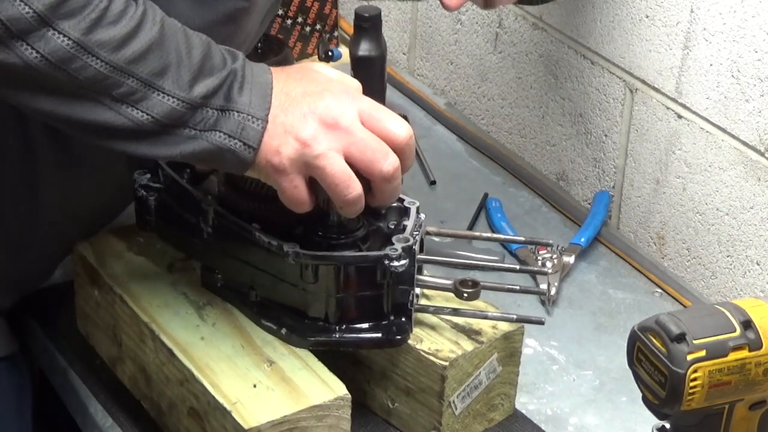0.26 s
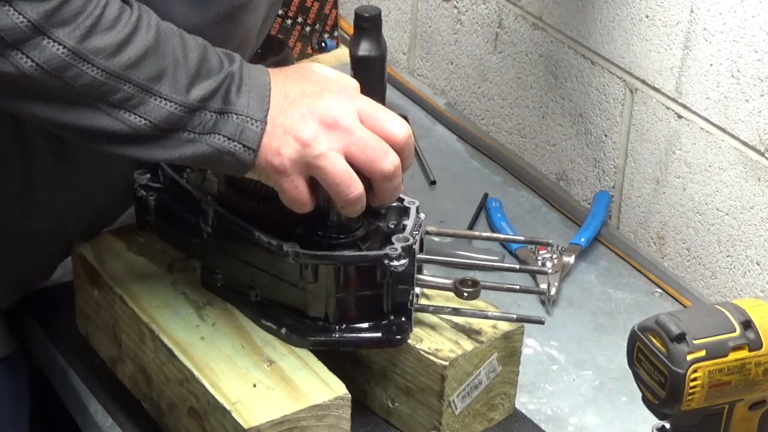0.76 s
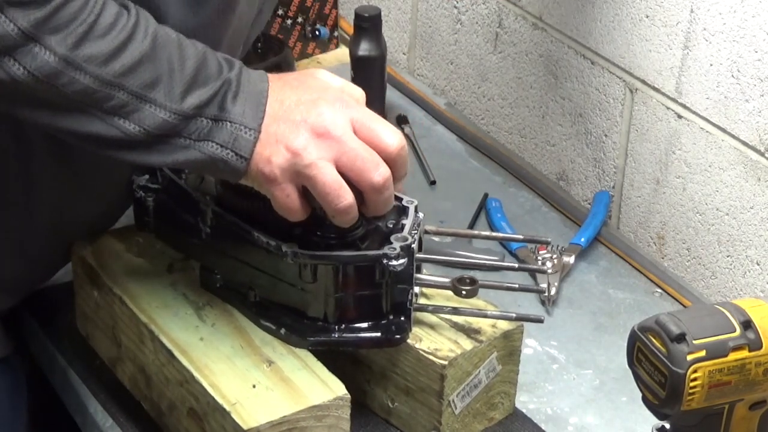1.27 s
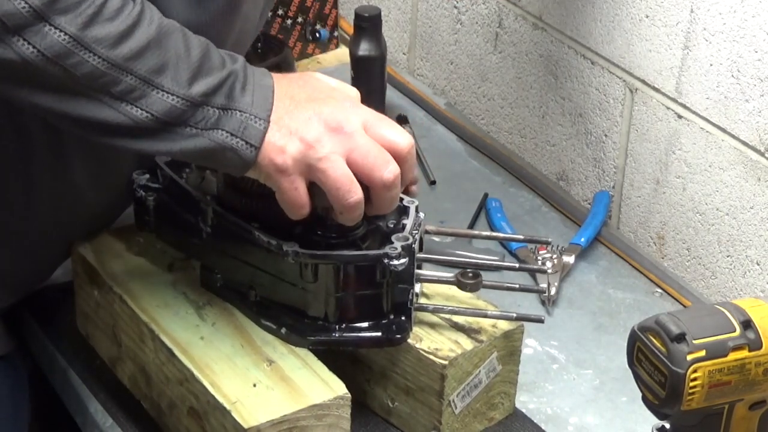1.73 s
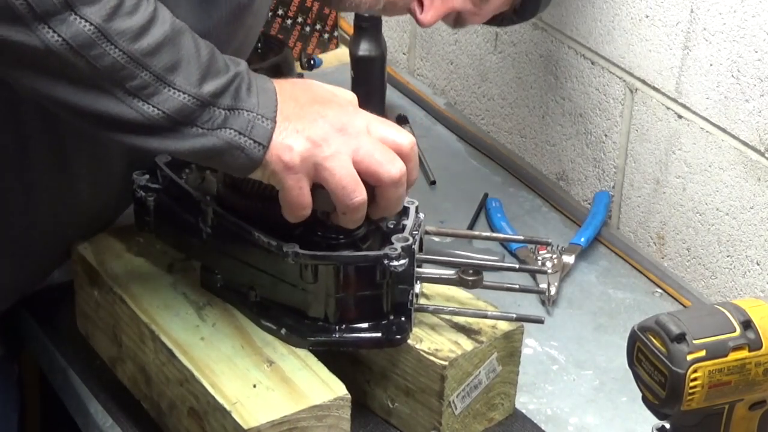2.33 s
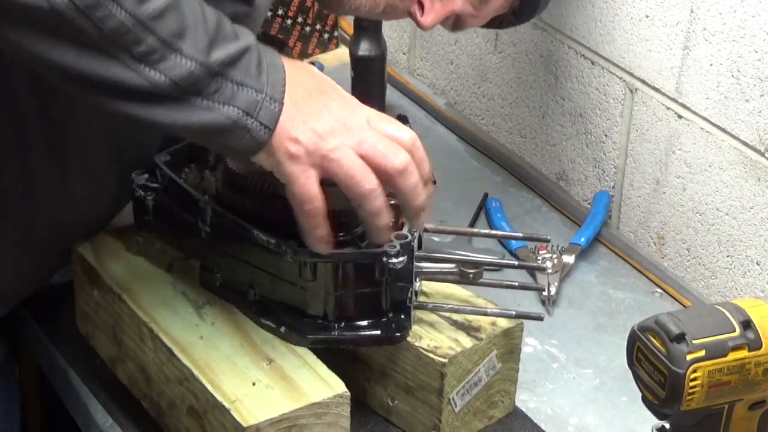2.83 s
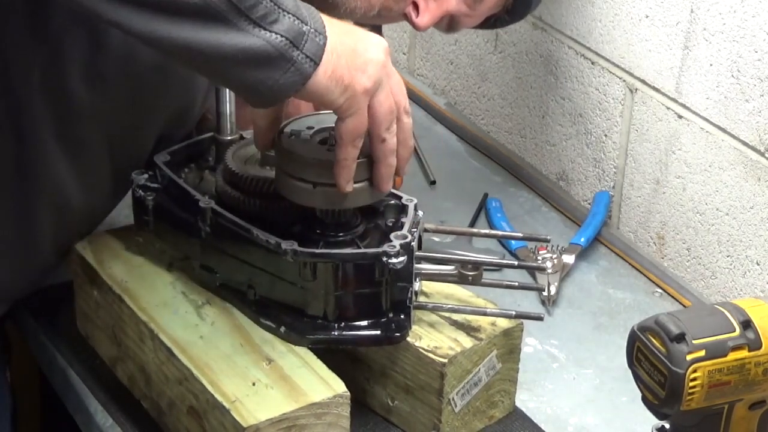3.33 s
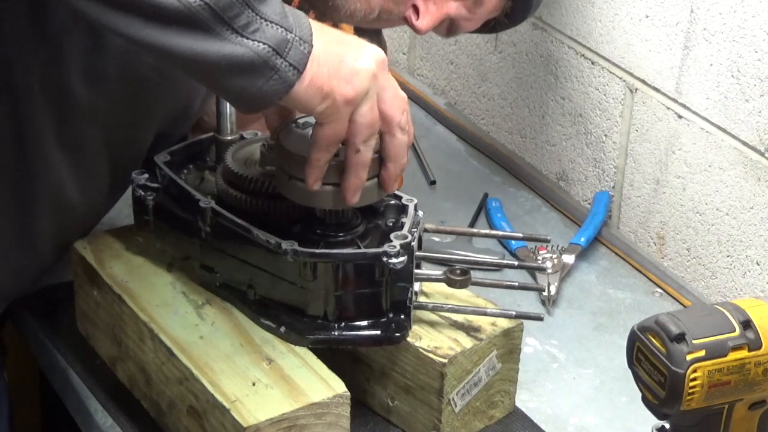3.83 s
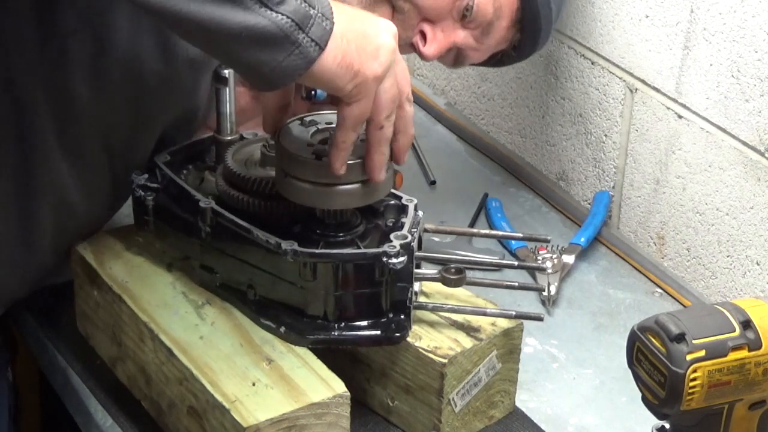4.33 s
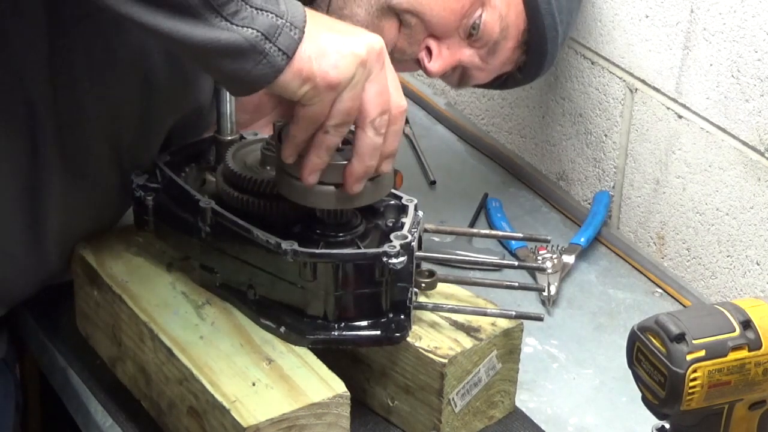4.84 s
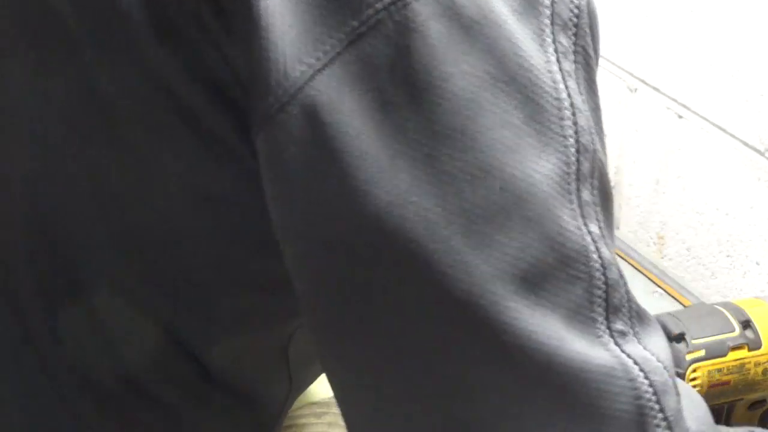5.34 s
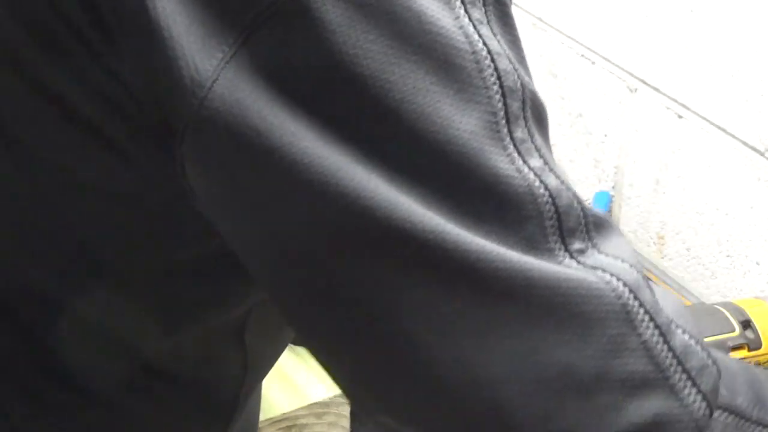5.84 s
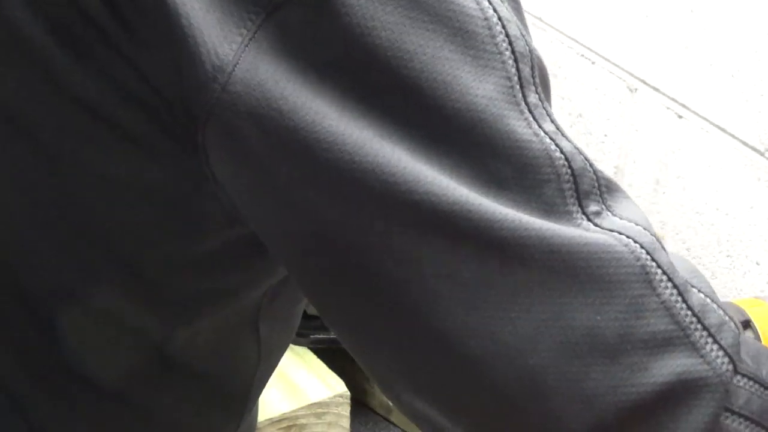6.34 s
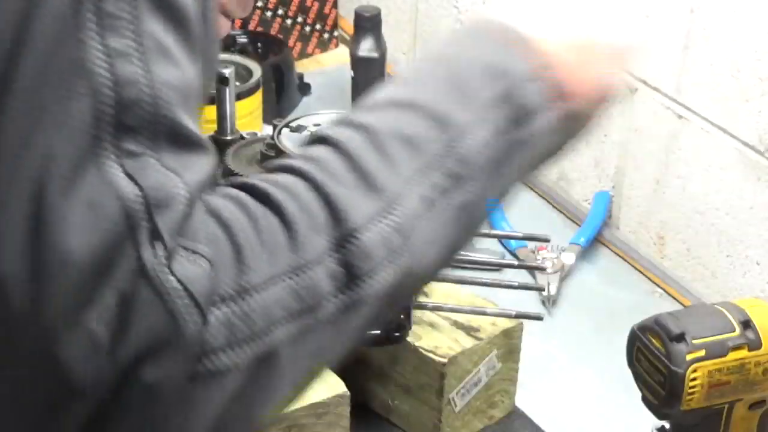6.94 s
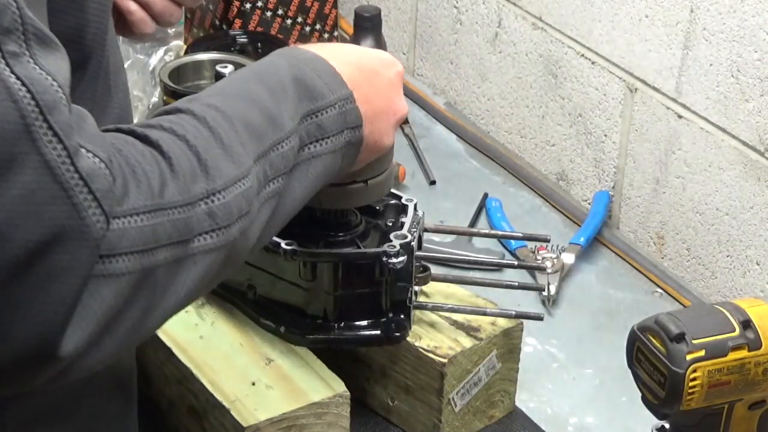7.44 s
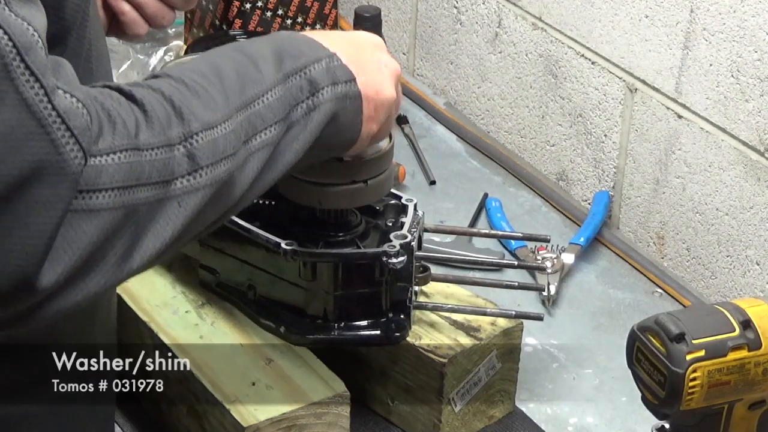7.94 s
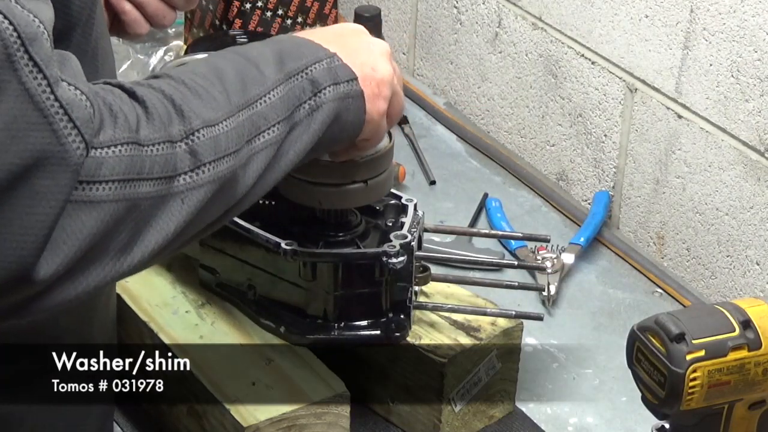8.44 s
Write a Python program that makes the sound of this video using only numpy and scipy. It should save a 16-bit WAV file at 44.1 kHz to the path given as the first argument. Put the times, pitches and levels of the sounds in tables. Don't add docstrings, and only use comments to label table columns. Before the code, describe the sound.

A heavy metal drum knocks and drops ringing into a hollow gearcase, then a motor hums while gears clink and a thin washer pings.

```python
import sys
import numpy as np
from scipy import signal
from scipy.io import wavfile
from scipy.ndimage import uniform_filter1d

SR = 44100
rng = np.random.default_rng(int(sys.argv[2]) if len(sys.argv) > 2 else 0)


def boost_factor(decibels):
    exponent = np.asarray(decibels, float) / 20
    return 10 ** exponent


def wrap_up_sound(samples):
    columns = np.atleast_2d(samples).T
    tamed = np.clip(columns, -1, 1)
    steps = np.round(tamed * 32767).astype(np.int16)
    wavfile.write(sys.argv[1], SR, steps)


N = 383217

# t/s, peak level/dB, thud under it/dB, edge
# over it/dB
DAMPED_TAPS = [(0.0014, -52, 11, 8), (0.0287, -22, -22, -1), (0.0454, -51.5, 18.5, -9),
               (0.5274, -46, -12, 12), (0.534, -41.5, -21, 1), (0.925, -43, 4, -20.5),
               (1.2288, -37, -21, -11), (1.4892, -47, 4, -2), (1.6781, -56, 19, 3), (2.4905, -52.5, 5, -2),
               (2.8202, -63, 3, 14), (2.845, -63.5, 1, 14), (2.8836, -38, 2, -26), (2.9148, -42.5, -23, -5),
               (3.5445, -44, 6.5, -9), (4.006, -48.5, -16, 4), (4.241, -52, -17, -10),
               (4.698, -38, -29, -7.5), (4.9136, -23.5, -17, -18.5), (5.5995, -47.5, 13.5, 0),
               (5.4633, -39.5, 4.5, -30), (5.314, -41, 5, -30), (6.098, -28, -17, -6),
               (6.1048, -29, -32, -21.5)]
# f/Hz, level/dB, time to fade 60 dB/s
GEAR_RIM = [(5680, -6, .07), (7885, 1, .08), (10400, -16, .06)]
# f/Hz, level/dB, time to fade 60 dB/s
GEAR_HUB = [(1980, -9, .03), (2760, -7, 0.04), (3105, -10, 0.04), (4440, -13, 0.029), (6560, -11, 0.03)]
# t/s, peak level/dB, brightness step per band/dB, ring/dB
WASHER_PINGS = [
    (7.9835, -28, 4.5, -25),
    (8.0195, -37, 6, -21),
    (8.0249, -25.5, 9, -30),
    (8.4259, -46, 5, -23),
    (8.4455, -25, 9, -28),
    (8.4625, -20, 9, -29.5),
    (8.465, -24.5, 1, -32),
    (8.5078, -25.5, 8, -30),
]


def rms_one(x):
    return x / np.sqrt(np.mean(x ** 2) + 1e-20)


def in_time(rows):
    s, *columns = np.transpose(rows)
    return [np.interp(np.arange(N) / SR, s, c, left=-150, right=-150) for c in columns]


def at_hz(points, hz):
    pitches, values = np.array(points)[:, 0], np.array(points)[:, 1]
    return np.interp(np.log(hz), np.log(pitches), values)


def band(x, low_hz, high_hz):
    return signal.sosfilt(signal.butter(2, [low_hz, high_hz], "band", fs=SR, output="sos"), x)


def drift(rate):
    r = np.exp(-80 * np.pi * rate / SR)
    white = rng.standard_normal(N // 40 + 2002)
    slow = signal.lfilter([1], [1, -2 * r, r * r], white)[2000:]
    return np.interp(np.arange(N) / 40, np.arange(len(slow)), rms_one(slow))


def ring(force, modes):
    out = 0
    for k, (hz, level_db, t60) in enumerate(modes):
        r, w = boost_factor(-60 / (t60 * SR)), 2 * np.pi * hz / SR
        gain = (-1) ** k * boost_factor(level_db) * np.sin(w)
        out = out + signal.lfilter([0, gain], [1, -2 * r * np.cos(w), r * r], force + 1e-18)
    return out


def banded_noise(spectrum, low_hz, count, patchy_db):
    # f/Hz, likeness/0 to 1
    likeness = [(100, 0.55), (250, 0.94), (1000, 0.27), (2500, 0.13), (4000, 0.94), (12000, 1)]
    out, white = 0, rng.standard_normal((2, 2, N))
    edges = low_hz * 2 ** (np.arange(count + 1) / 2)
    for k, (low, high) in enumerate(zip(edges, edges[1:])):
        mid, side = band(white[k % 2], low, high)
        hz = np.sqrt(low * high)
        alike = np.clip(at_hz(likeness, hz), 0, 1)
        gain = boost_factor(at_hz(spectrum, hz) + patchy_db * drift(2.54))
        out = out + gain * (np.sqrt(1 + alike) * mid + np.sqrt(1 - alike) * side * [[1], [-1]])
    return rms_one(out)


def contacts(events, rough_share):
    force, t = np.zeros((4, N + 4096)), np.arange(4096) / SR
    chatter, share = rng.standard_normal((len(events), 4096)), np.array(rough_share)[:, None]
    for (s, *levels_db, ms), rough in zip(events, chatter):
        push = np.minimum(t / .0006, 1) * np.exp(-3000 * t / max(ms, .3))
        first = round(s * SR)
        force[:, first:first + 4096] += boost_factor(levels_db)[:, None] * push * (share * rough + 1 - share)
    return force[:, :N] + 1e-18


def blows(events, bench_db, thud_db, edge_db):
    low_hz, high_hz, bench_under_thud_db = 1000, 4000, -16.5
    rows = [(s, db, db + low + bench_under_thud_db, db + low, db + high, ms)
            for s, db, low, high, ms in events]
    body, bench, thud, edge = contacts(rows, (1, 0, .8, 1))
    body = band(band(body, low_hz, high_hz), 700, 5000)
    edge = band(band(edge, high_hz, 9660), 2060, 11400)
    return (boost_factor(bench_db) * band(bench, 96, 290) + boost_factor(thud_db) * band(thud, 325, low_hz)
            + boost_factor(6.0) * body + boost_factor(edge_db) * edge)


def strikes(events):
    out = np.zeros(N)
    out[[round(row[0] * SR) for row in events]] = boost_factor([row[1] + 0.52 * row[2] for row in events])
    return out


def grit(per_s, spread_db):
    sizes = boost_factor(spread_db * np.minimum(rng.exponential(1, N), 5)) * rng.choice([-1, 1], N)
    return rms_one(sizes * (rng.random(N) < per_s / SR))


def strokes(rows, rise_share):
    t, out = np.arange(0, N + 32, 32) / SR, 0
    for s, level_db, hold, fade in rows:
        away = np.maximum(np.maximum((s - t) / rise_share, t - s - hold), 0)
        out = out + boost_factor(level_db - 20 * away / max(fade, .005))
    return np.interp(np.arange(N) / SR, t, out)


def held_rings(events, rough_db):
    out, t, flutter = np.zeros(N + SR), np.arange(SR // 4) / SR, rough_db * drift(260)
    for k, (s, level_db, hz, hold, t60) in enumerate(events):
        fade_db = 60 * np.maximum(t - hold, 0) / max(t60, .005)
        shape_db = level_db - fade_db + flutter[k * 5000:][:SR // 4]
        swell = np.minimum(t / .0015, 1)
        out[round(s * SR):][:SR // 4] += boost_factor(shape_db) * swell * np.sin(2 * np.pi * hz * t)
    return out[:N]


def dense_tail(x, colour, t60s, alike):
    t, tail = np.arange(SR) / SR, 0
    common, own = rng.standard_normal((2, 2, SR))
    for k, hz in enumerate(100 * 2 ** np.arange(0, 7.1, .25)):
        white = common[k % 2] + (1 - alike) * min(hz / 1000, 1) * own[k % 2] * [[1], [-1]]
        fading = boost_factor(at_hz(colour, hz) - 60 * t / at_hz(t60s, hz))
        tail = tail + band(white, hz / 2 ** .125, hz * 2 ** .125) * fading
    tail = tail * np.clip(t / 0.0019, 0, 1) / np.sqrt(SR)
    return signal.fftconvolve(x[None], tail, axes=1)[:, :N]


def tilted(events, middle_db, ms):
    return [(s, db - tilt, db + middle_db, db + tilt, db + rung, ms) for s, db, tilt, rung in events]


def clinks(events, edges_hz, free_modes, held_modes, ring_db, held_db):
    *forces, free = contacts(events, (1, 1, 1, 1))
    crack = sum(boost_factor(gain_db) * band(band(force, low, high), low / 1.86, high * 0.78)
                for force, gain_db, low, high in zip(forces, (4, 6, 6), edges_hz, edges_hz[1:]))
    return crack + boost_factor(held_db) * ring(crack, held_modes) + boost_factor(ring_db) * ring(free, free_modes)


def room_air():
    # f/Hz, level per Hz/dB
    air_colour = [(65, -41), (110, -9.5), (130, -12.5), (237, -9), (317, -9.5), (352, -10.5), (898, -18.5),
                  (1100, -27), (1200, -19.5), (3000, -26), (3260, -26.5), (15800, -36.5)]
    return banded_noise(air_colour, 90, count=15, patchy_db=0.5)


def lens_ticks():
    ticks_per_s, t = 29.97, np.arange(N) / SR
    since_tick = ((t - .005) * ticks_per_s % 1) / ticks_per_s
    steps = np.exp(-since_tick / .005) * boost_factor(1.5 * drift(10))
    return boost_factor(-16.0) * rms_one(ring(steps * rng.standard_normal(N),
                                     [(2360, 0.012, 0.0088), (3320, 0.008, 0.0084)]))


def whine():
    return boost_factor(-84) * rms_one(ring(rng.standard_normal(N), [(7870, 0, .05)]))


def rumble(air_db, hum_db):
    # f/Hz, level per Hz/dB
    deep_colour = [(12, -1), (25, 14), (40, 2), (60, -7.5), (90, -2.5), (125, -37.5)]
    # t/s, level/dB, hold/s, fade by 20 dB/s
    gusts = [
        (0.001, -41, .01, .5),
        (3.38, -58, 0.068, 0.5),
        (4.09, -50.5, 0.011, -1.1),
        (4.69, -55, 0.008, -2),
        (5.23, -31, 0.026, -0.11),
        (6.3, -35, 0.071, 1.3),
        (7.16, -27, 0.0096, -0.34),
        (7.5, -40, 0.83, 0),
        (8.66, -34.5, 0.037, 1.06),
    ]
    over_air_db, motor_shake_db = 5, -40.5
    shake = boost_factor(motor_shake_db) * (hum_db > -100) + boost_factor(hum_db - 26)
    deep, other = banded_noise(deep_colour, 12.05, count=7, patchy_db=2.0)[0], rng.standard_normal(N)
    room = boost_factor(air_db + over_air_db) * rms_one(band(other, 27.0, 70.0))
    return room + np.hypot(shake, strokes(gusts, 0.94)) * deep


def thumps_and_squeaks():
    # t/s, peak level/dB, f/Hz, time to fade 60 dB/s
    thumps = [(.001, -18.5, 142, 0.07), (.029, -26, 200, 0.026), (.142, -56, 202, 0.036),
              (0.161, -31, 199, 0.023), (1.337, -28, 198, 0.059), (1.35, -23.5, 218, 0.083),
              (1.368, -28, 139, 0.16), (1.489, -35, 129, 0.14), (2.053, -32.5, 139, 0.14),
              (2.063, -32, 221, 0.037), (2.886, -28.5, 136, 0.067), (4.69, -44, 274, 0.43)]
    # t/s, peak level/dB, f/Hz, time to fade 60 dB/s
    squeaks = [(.066, -49, 5840, 0.15), (.585, -58, 4600, .3), (.66, -56, 3890, .25),
               (.74, -50, 5850, 0.13), (0.754, -46, 5840, .08), (0.973, -37, 5950, 0.073),
               (4.008, -38, 7200, 0.075), (4.485, -52, 7260, 0.051), (5.315, -18.5, 2777, 0.056),
               (1.326, -16, 3210, 0.034), (1.326, -20, 5940, 0.042), (1.326, -19, 9100, 0.027),
               (2.046, -15.5, 2470, 0.032)]
    out, t = np.zeros(N), np.arange(SR // 4) / SR
    for s, level_db, hz, t60 in squeaks + thumps:
        shape = boost_factor(level_db - 60 * t / t60) * np.minimum(t / .002, 1)
        out[round(s * SR):][:SR // 4] += shape * np.sin(2 * np.pi * hz * t)
    return out


def taps():
    contact_ms = 13.3
    return blows([row + (contact_ms,) for row in DAMPED_TAPS], 2.1, 14.0, 5.0)


def rubs():
    # t/s, level/dB, f/Hz, hold/s, time to fade 60 dB/s
    faint = [(.104, -47.5, 2590, 0.013, 0.028), (.102, -41, 693, 0.011, .04),
             (.981, -38.5, 1500, 0.01, .03), (.998, -33, 1930, 0.0051, 0.034),
             (.99, -38, 650, 0.017, 0.066), (5.16, -57, 15200, .12, .05), (5.16, -57, 13000, .12, .05),
             (5.225, -44, 12100, .01, .04), (.03, -46.5, 651, 0.028, 0.18),
             (3.545, -48.5, 650, 0.008, 0.064), (3.545, -54, 2410, 0.0046, .05),
             (4.82, -63, 5000, 0.11, .05), (5.064, -42, 7850, .008, .03), (5.064, -43, 8600, .006, .02),
             (5.31, -47, 524, 0.023, 0.087), (6.002, -44, 12800, .004, 0.06), (6.003, -43, 15200, .01, .12),
             (6.27, -56, 6200, .01, .03), (6.32, -48.5, 6220, 0.029, .05), (6.327, -49, 8070, .012, .04),
             (6.425, -48.5, 6460, 0.0068, .03), (6.427, -50.5, 2770, 0.013, .05)]
    # t/s, level/dB, f/Hz, hold/s, time to fade 60 dB/s
    gear_rubs = [(5.102, -41, 7750, .008, .03), (5.112, -24, 7880, .003, 0.041),
                 (5.112, -29, 5680, 0.0035, 0.062), (5.112, -30, 3620, 0.0036, 0.045),
                 (5.14, -43, 7870, .02, .03), (5.14, -46, 5680, .02, .03), (5.162, -43, 7800, 0.044, .03),
                 (5.163, -38, 4390, 0.026, .03), (5.163, -40, 5600, 0.025, .05),
                 (5.173, -44, 10500, 0.045, .08), (5.206, -24.5, 4380, 0.02, .04),
                 (5.221, -29, 2870, 0.012, 0.031), (5.222, -42, 3780, .015, .04),
                 (5.225, -33, 7870, .017, 0.097), (5.226, -26.5, 5550, 0.01, 0.055),
                 (5.274, -38, 4360, .008, .02), (5.284, -27.5, 2167, .004, 0.063),
                 (5.284, -22, 7120, 0.0022, .02), (5.313, -19.5, 6465, 0.0018, 0.034),
                 (5.45, -51, 4200, .006, .02), (5.463, -21, 3050, 0.005, 0.029),
                 (5.463, -35, 1907, 0.0088, 0.058), (5.468, -32, 7800, .003, 0.045),
                 (5.476, -34, 3050, 0.0086, .04), (5.49, -54, 3190, 0.02, 0.3),
                 (5.284, -30, 2600, 0.0043, 0.047), (5.335, -44, 2760, .02, 0.25),
                 (5.974, -25.5, 7000, .002, 0.026), (5.975, -36, 11400, .004, 0.034),
                 (6.002, -23.5, 7850, 0.0037, 0.048), (6.004, -30.5, 5690, .004, 0.12),
                 (6.043, -31.5, 3770, 0.0027, 0.067), (6.047, -22, 6519, .004, .025),
                 (6.06, -41, 7900, 0.012, 0.13), (6.062, -38, 5690, 0.014, 0.13),
                 (6.098, -39.5, 1750, 0.0081, 0.032), (6.113, -47, 2980, 0.011, .04)]
    return held_rings(gear_rubs + faint, 5.5)


def case():
    # t/s, peak level/dB, thud under it/dB, edge over it/dB, contact/ms
    knocks = [(0.0656, -43, 11, -17, 17), (0.1008, -45.5, -1, -8, 60), (0.1605, -55.5, 20.5, -11, 9.8),
              (0.9789, -35, -2.5, -8, 48), (0.9975, -36, 0.5, -18, 28), (1.3256, -19.5, -38, -7.5, 36),
              (1.3338, -16.5, -14, -2, 11), (1.3375, -8.5, -4, -24, 5.3), (1.419, -45.5, 17.5, -25, 23),
              (2.01, -56, 17.5, 10.5, 8.7), (2.0444, -22.5, -3, -13.5, 4.1), (2.0464, -6.5, -17, -2, 6.1),
              (2.0521, -4, -13, -24, 8.3), (2.0565, -10, -12, -15, 6.4)]
    # f/Hz, level/dB, time to fade 60 dB/s
    hollow = [(614, -15, 0.028), (1358, -6, 0.03), (1564, -13, 0.073), (2016, -12.5, 0.019)]
    # f/Hz, level/dB, time to fade 60 dB/s
    loose_modes = [(570, 3.5, 0.45), (1234, 6.5, 0.34), (1349, -2, 0.21), (1395, 8, 0.16), (3585, 9.5, 0.1),
                   (5950, -5, 0.11), (6460, 10, 0.1), (8240, 3.5, 0.17), (665, 5, 0.25), (1910, -1, .15),
                   (3500, 6.5, 0.13), (7180, -8, .25), (9000, -6, 0.13), (11700, -16.5, .12)]
    # f/Hz, level/dB, time to fade 60 dB/s
    seated_modes = [(480, -7.5, 1.13), (524, 2, .3), (1072, 2, 0.26), (1260, 1, 0.25), (1280, 6, 0.4),
                    (1306, 1, 0.3), (1350, 3.5, 0.35), (1430, 2.5, 0.6), (1850, 4.5, 0.33), (1563, 1, .3),
                    (2050, 2, 0.28), (2068, 2, 0.25), (2730, -5, 0.34), (5680, 1, 0.2)]
    # f/Hz, level per Hz/dB
    shell_colour = [(100, -22.5), (200, 1.5), (330, -2.5), (560, 0), (750, -8.5), (1050, -6), (1340, 5),
                    (1680, -9), (2100, 0.5), (2450, -11.5), (3000, -10.5), (4200, -18), (5800, -9),
                    (13000, -30)]
    # f/Hz, time to fade 60 dB/s
    shell_t60 = [(100, 0.33), (500, 0.63), (1000, 0.61), (1400, 0.7), (2000, 0.54), (3000, 0.32),
                 (6000, 0.33), (12000, 0.37)]
    seated_s, loose_top_hz = 1.9, 11500
    chatter_s, gap_s, chatter_ms = 2.0604, .012, 18
    first_db, loss_db, thud_db, edge_db = -21, 4.5, -26, -33.5
    chatter = [(chatter_s + k * gap_s, db, thud_db - db, edge_db - db, chatter_ms)
               for k, db in enumerate(first_db - loss_db * np.arange(5))]
    force, clicks = blows(knocks + chatter, 1.7, 14.8, 9.2), strikes(knocks)
    seated = np.arange(N) > seated_s * SR
    crack = boost_factor(np.where(seated, -5.0, -.5)) * force
    boom_force = boost_factor(np.where(seated, 3.0, 9.0)) * clicks
    boom_force = boom_force + boost_factor(21) * strikes(chatter) + boost_factor(1.5) * strikes(DAMPED_TAPS)
    modes = boost_factor(-23) * ring(clicks * ~seated, loose_modes) + boost_factor(-20) * ring(clicks * seated, seated_modes)
    shell = dense_tail(boost_factor(np.where(seated, 23.0, 18.0)) * force, shell_colour, shell_t60, 0.4)
    bright = crack + ring(boom_force, hollow) + modes
    dull = signal.sosfilt(signal.butter(6, loose_top_hz, fs=SR, output="sos"), bright)
    return np.where(seated, bright, dull) + shell


def drum_turning():
    # t/s, level/dB, hold/s, fade by 20 dB/s
    drag = [
        (.59, -56.5, 0.48, -0.3),
    ]
    # t/s, level/dB, hold/s
    turning = [
        (3.155, -65, .045),
        (3.378, -65, .04),
        (3.955, -67, .065),
        (4.092, -67, .04),
        (4.208, -63, .008),
        (4.275, -66, .045),
        (4.432, -60, .008),
        (4.55, -60, .01),
    ]
    # f/Hz, level/dB, time to fade 60 dB/s
    drum_modes = [(5260, -3.5, 0.004), (6580, -7, 0.011), (8700, -6, 0.013), (11450, -5, 0.006)]
    push_fade_s = .03
    slips = grit(3300, 1.0)
    pushes = strokes([row + (push_fade_s,) for row in turning], 0.48)
    dragged = strokes(drag, 1.0) * rms_one(band(slips, 2000, 5700))
    return boost_factor(5.5) * pushes * rms_one(ring(slips, drum_modes)) + dragged


def sleeve():
    # t/s, level/dB, hold/s, fade by 20 dB/s
    brushes = [(.982, -59, .002, 1.25), (2.808, -67, .125, 4), (5.582, -55, 0.029, 0.47),
               (1.48, -60, 0.03, .08), (5.72, -56.5, 0.02, -0.83), (6.19, -55, 0.015, 0.04),
               (6.268, -57, .008, 0.03), (6.325, -52, 0.03, 0.05), (6.42, -52, .01, 0.17),
               (6.5, -52.5, .005, -0.2), (6.994, -56, 0.0021, 0.7), (7.24, -50, .002, -0.11),
               (7.45, -60, 0.11, 1)]
    # f/Hz, level per Hz/dB
    cloth = [(700, 4.5), (2000, 5), (4000, -4), (7000, 5), (9500, -2.5), (12000, -17.5), (15000, -29)]
    return boost_factor(1.0) * strokes(brushes, 0.56) * banded_noise(cloth, 708, count=9, patchy_db=-2.0)


def hum(hum_db):
    # f/Hz, level/dB
    motor_tones = [(88.6, 3), (99.5, -7.5), (177.2, -17.5), (232, -22)]
    t = np.arange(N) / SR
    running = np.clip((t - 5.0) / 0.053, 0, 1)
    tones = sum(boost_factor(db + 0.5 * drift(2.6)) * np.sin(2 * np.pi * hz * t) for hz, db in motor_tones)
    return running * boost_factor(hum_db) * tones


def gear_clinks():
    # t/s, peak level/dB, brightness step per band/dB, ring of the rim/dB
    gear_hits = [(5.0219, -32.5, -2.5, -32), (5.0635, -37, -4, -30), (5.103, -41, 3, -9),
                 (5.1125, -24.5, -2, -20), (5.163, -29.5, 0.5, -14), (5.1759, -27.5, 0, -17),
                 (5.2079, -28, -5, -18), (5.2115, -22.5, -8, -18), (5.2215, -29, -5, -23),
                 (5.2283, -29, -10, -17), (5.2828, -15, -4, -40), (5.3132, -25.5, -7.5, -21),
                 (5.3195, -27.5, -12, -11), (5.4627, -21.5, -6.5, -15), (5.4677, -24.5, -0.5, -24),
                 (5.4765, -44, -13, -20), (5.9738, -29, -0.5, -26), (6.0018, -16.5, 2, -12),
                 (6.043, -20, 1.5, -20), (6.0487, -22, 1, -18), (6.0619, -25.5, -5, -15),
                 (6.1907, -42.5, -6, -30), (6.3279, -58.5, 0, -27), (6.3498, -43, -4, -30),
                 (6.4267, -51, -17, -30), (6.476, -55, 9, -30)]
    middle_db, contact_ms = 2.5, 11.1
    return clinks(tilted(gear_hits, middle_db, contact_ms), (1600, 3500, 7000, 13000),
                  GEAR_RIM, GEAR_HUB, -19.0, -34.0)


def meshing():
    # t/s, level/dB, centre of the scrape f/Hz
    slides = [(5.08, -64, 4860), (5.096, -72, 4800), (5.112, -30.5, 4770), (5.15, -36.5, 5000),
              (5.205, -23.5, 4540), (5.217, -32, 4300), (5.225, -19.5, 3820), (5.24, -25, 3450),
              (5.258, -40, 3000), (5.266, -54, 4050), (5.282, -30, 4040), (5.42, -57, 2570)]
    level_db, centre_hz = in_time(slides)
    slips = boost_factor(level_db - 4.5 + 1.2 * drift(60)) * grit(2600, 1.1)
    scrape = 0
    for hz in np.geomspace(2000, 7000, 6):
        nearness = np.exp(-(np.log(np.maximum(centre_hz, 100) / hz) / .25) ** 2)
        scrape = scrape + nearness * band(slips, hz / 1.15, hz * 1.15)
    rung = boost_factor(-31.5) * ring(slips, GEAR_RIM) + boost_factor(-30.5) * ring(slips, GEAR_HUB)
    return boost_factor(8.0) * scrape + boost_factor(2.0) * band(slips, 1550, 7600) + rung


def washer_clinks():
    # f/Hz, level/dB, time to fade 60 dB/s
    washer_modes = [(10594, 0, .22), (10640, -13, .3), (10952, -8, .13)]
    # f/Hz, level/dB, time to fade 60 dB/s
    shaft_modes = [(2980, -16, 0.03), (4720, -22, 0.01)]
    middle_db, contact_ms = 7.5, 15.6
    return clinks(tilted(WASHER_PINGS, middle_db, contact_ms), (1400, 5900, 9300, 11500),
                  washer_modes, shaft_modes, -18.0, -17.5)


def washer_seating():
    # t/s, level/dB, f/Hz, hold/s, time to fade 60 dB/s
    shaft_rings = [
        (7.984, -38, 8700, 0.0055, .03),
        (7.985, -32, 6700, .002, .015),
        (8.026, -26, 6860, .002, .015),
        (8.026, -30, 8670, .005, .03),
        (8.464, -28, 4700, 0.0035, 0.02),
        (8.464, -30, 6465, 0.0034, 0.021),
        (8.463, -25, 8500, 0.006, 0.027),
        (8.509, -33, 6900, .004, .025),
    ]
    return held_rings(shaft_rings, 5.5)


def washer_singing():
    # t/s, level/dB, f/Hz, hold/s, time to fade 60 dB/s
    songs = [
        (8.025, -26, 10594, .032, .12),
        (8.12, -50, 10594, .035, .2),
        (8.4455, -24, 10952, .003, .1),
        (8.4455, -33, 10594, .015, .03),
        (8.463, -21, 10594, .055, .1),
        (8.478, -26, 10952, .015, .1),
        (8.53, -35, 10594, .01, .3),
        (8.53, -42, 10640, .01, .3),
    ]
    return held_rings(songs, .7)


def room_echo(hits, touches):
    # f/Hz, level per Hz/dB
    room_colour = [(150, 25.5), (800, 6.5), (2000, 3.5), (4000, -5), (7000, 5), (10000, -0.5), (13000, -16)]
    # f/Hz, time to fade 60 dB/s
    room_t60 = [(150, 0.46), (800, 0.15), (3000, 0.35), (6000, 0.1), (12000, 0.23)]
    echo = boost_factor(12.5) * dense_tail(hits, room_colour, room_t60, 0.73)
    return echo + boost_factor(3) * dense_tail(touches, room_colour, room_t60, 0.6)


def scene():
    # t/s, level/dB
    air_gain = [(0.0, -52), (0.22, -53.5), (1.21, -54), (1.6, -57), (1.96, -57.5), (2.7, -60), (3.5, -58),
                (4.69, -55), (5.08, -49), (5.33, -47.5), (5.5, -52.5), (5.98, -54.5), (6.4, -52),
                (7.5, -50.5), (8.69, -50)]
    # t/s, level/dB
    motor = [
        (5.0, -40.5),
        (5.2, -46),
        (5.33, -75),
        (5.44, -45),
        (5.98, -47),
        (6.36, -40),
        (7.35, -40),
        (8.18, -48.5),
        (8.69, -35),
    ]
    gear_pan_db, washer_pan_db, snap_db = 1.5, .9, 8
    (air_db,), (hum_db,) = in_time(air_gain), in_time(motor)
    gears, washer, tapping = gear_clinks() + meshing(), washer_clinks(), taps()
    rubbing, seating = rubs(), washer_seating()
    echo = room_echo(gears + boost_factor(0.5) * washer + boost_factor(-1.5) * tapping, rubbing + seating)
    snap = boost_factor(snap_db) * band(strikes(WASHER_PINGS), 3300, 10000)
    washer = washer + snap + seating + washer_singing()
    small = (gears + rubbing) * boost_factor([[-gear_pan_db], [gear_pan_db]])
    small = small + washer * boost_factor([[-washer_pan_db], [washer_pan_db]]) + tapping + echo
    metal = case() * boost_factor([[.2], [-.2]]) + small + drum_turning() + thumps_and_squeaks()
    air = boost_factor(air_db + 3) * (room_air() + lens_ticks())
    return metal + air + whine() + rumble(air_db, hum_db) + hum(hum_db) + sleeve()


def treble_gaps(x):
    # t/s, length/s
    gap_times = [
        (1.318, .03),
        (5.289, .009),
        (5.462, .018),
    ]
    t, end = np.arange(N) / SR, 6 * SR
    gaps = sum((t > s) & (t < s + length) for s, length in gap_times)
    top = signal.sosfiltfilt(signal.butter(8, 12500, "high", fs=SR, output="sos"), x[:, :end])
    return np.hstack([x[:, :end] - top * uniform_filter1d(gaps * 1., 60)[:end], x[:, end:]])


def washer_hides_treble(x):
    above_hz, loud_db = 11300, -47
    first = round(WASHER_PINGS[0][0] * SR)
    late = x[:, first:]
    ringing = uniform_filter1d(band(late[0], 10450, 10750) ** 2, 1500) > boost_factor(2 * loud_db)
    top = signal.sosfiltfilt(signal.butter(8, above_hz, "high", fs=SR, output="sos"), late)
    return np.hstack([x[:, :first], late - top * uniform_filter1d(ringing * 1., 200)])


def top_cut(x):
    return signal.sosfilt(signal.butter(12, 15960, fs=SR, output="sos"), x)


def record(dry):
    mid, side = (dry[0] + dry[1]) / 2, (dry[0] - dry[1]) / 2
    side = signal.sosfilt(signal.butter(2, 200, "high", fs=SR, output="sos"), side)
    both = washer_hides_treble(np.array([mid + side, mid - side]))
    top = 1.1
    return top_cut(treble_gaps(top * np.tanh(both / top)))


dry = scene()
out = record(dry)
wrap_up_sound(out)
```